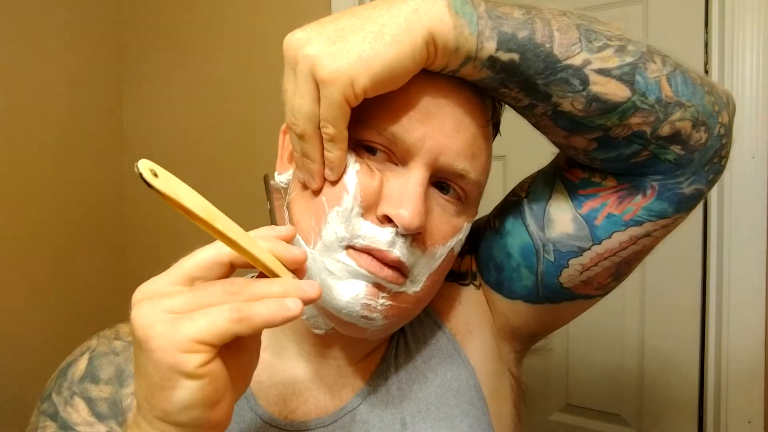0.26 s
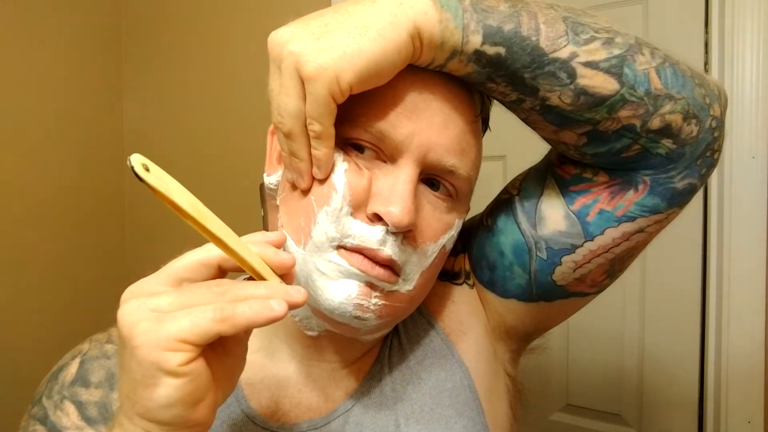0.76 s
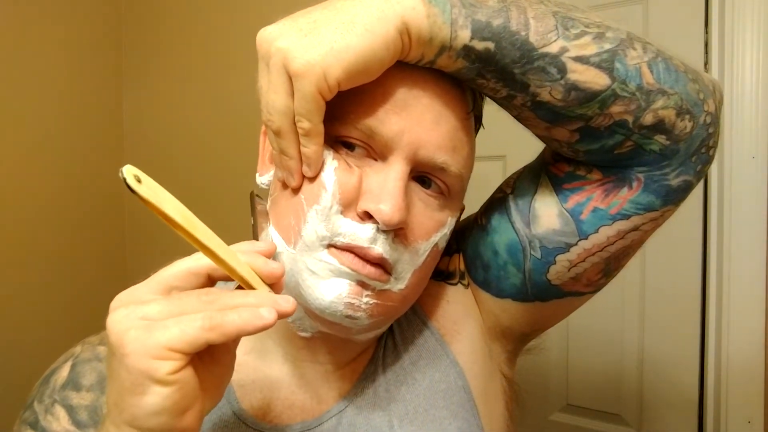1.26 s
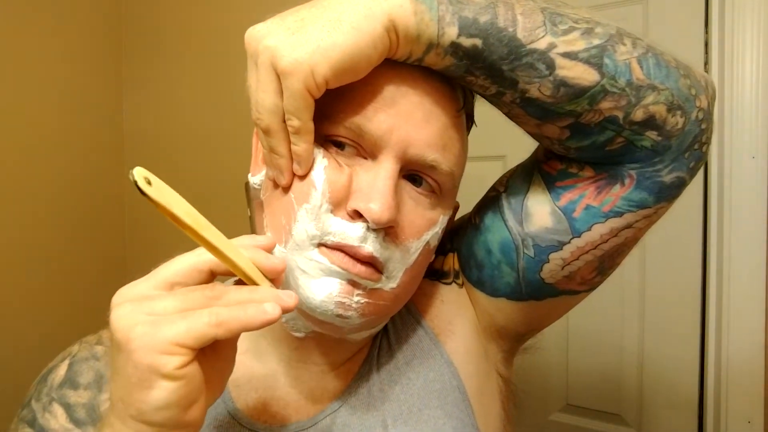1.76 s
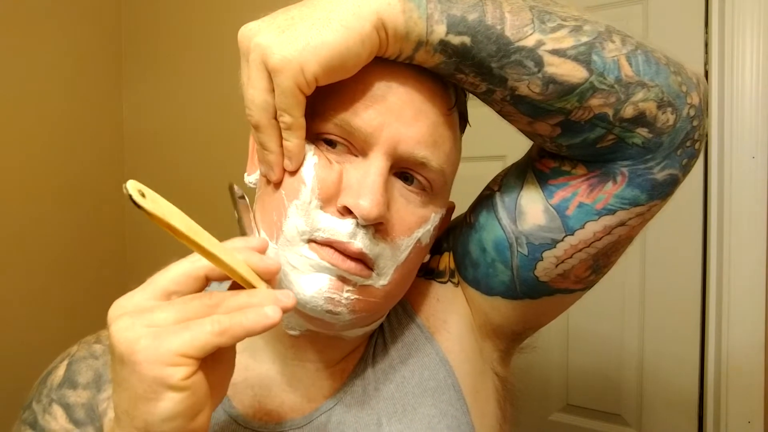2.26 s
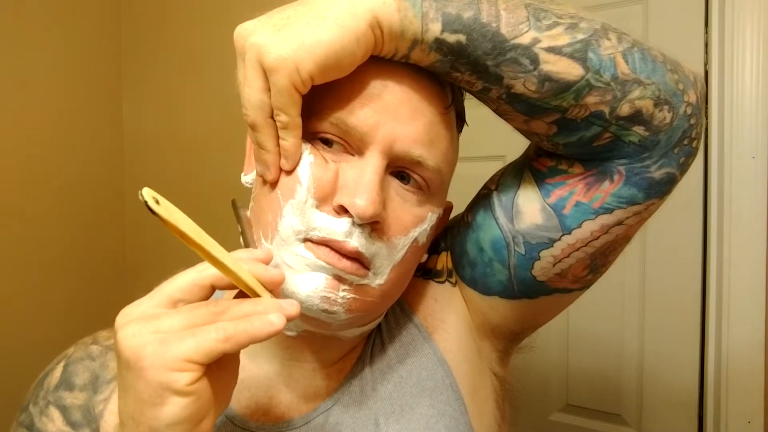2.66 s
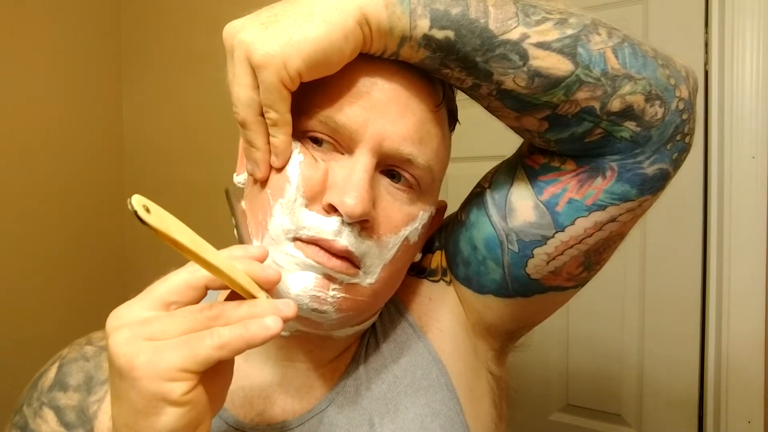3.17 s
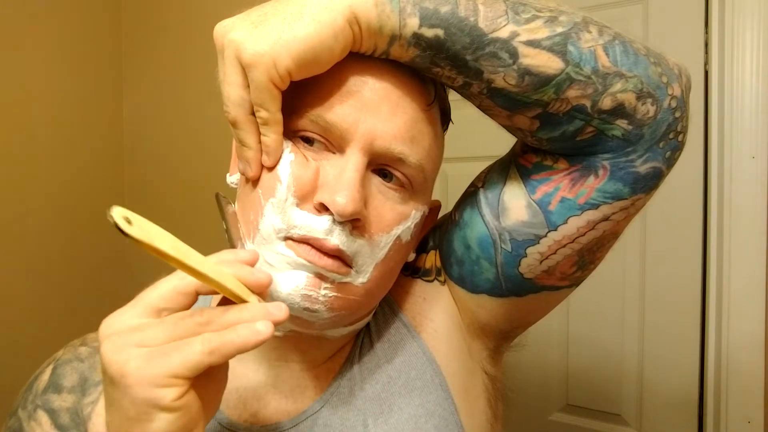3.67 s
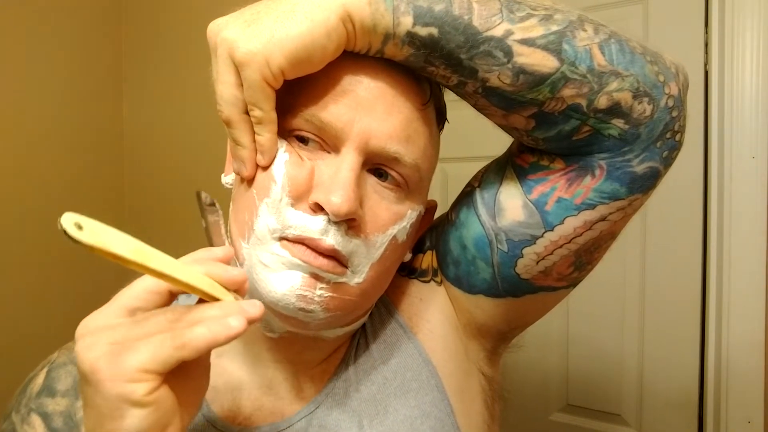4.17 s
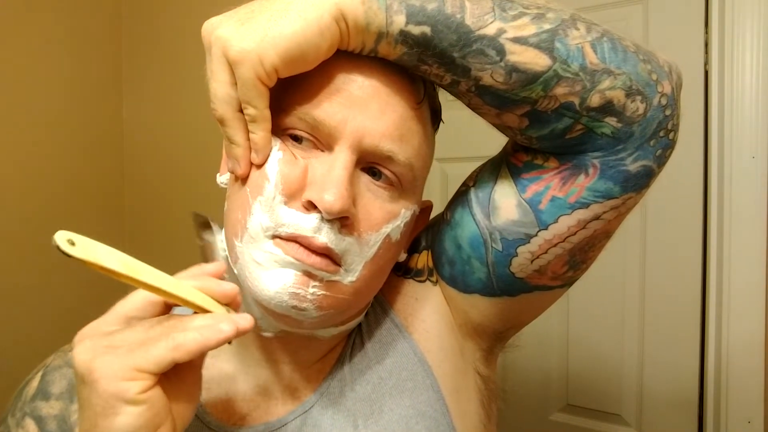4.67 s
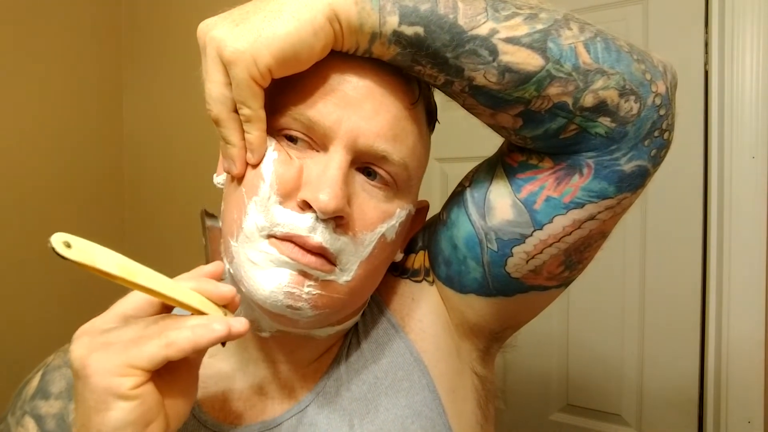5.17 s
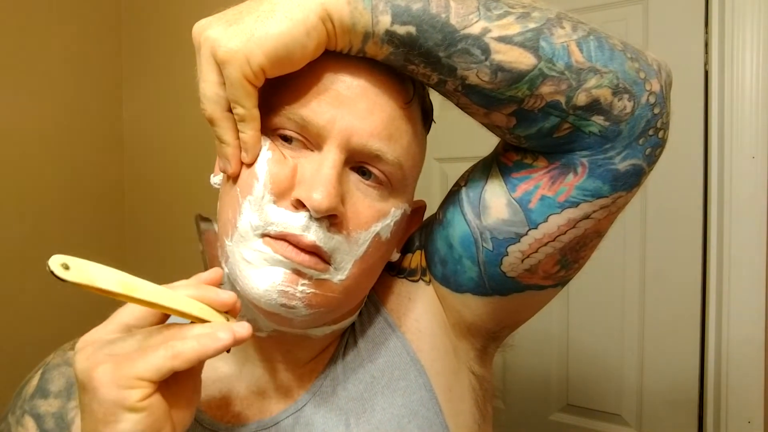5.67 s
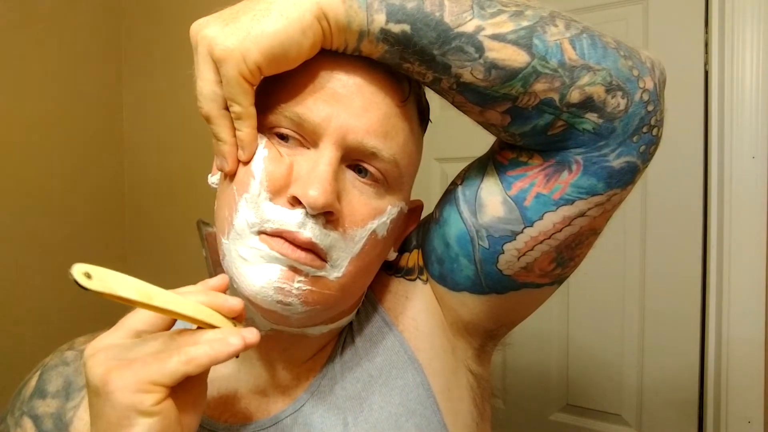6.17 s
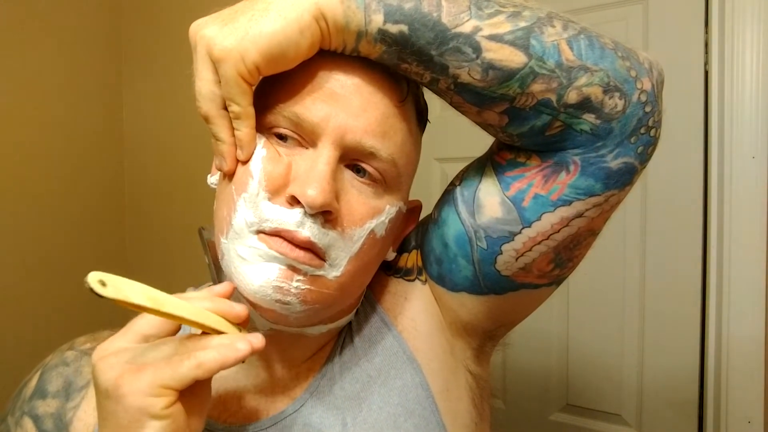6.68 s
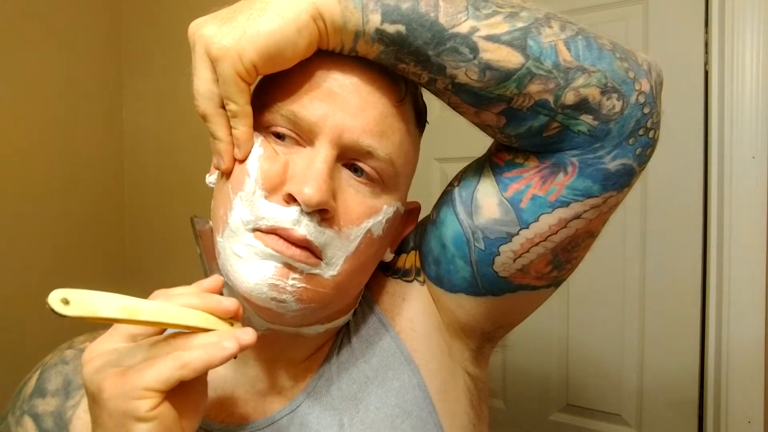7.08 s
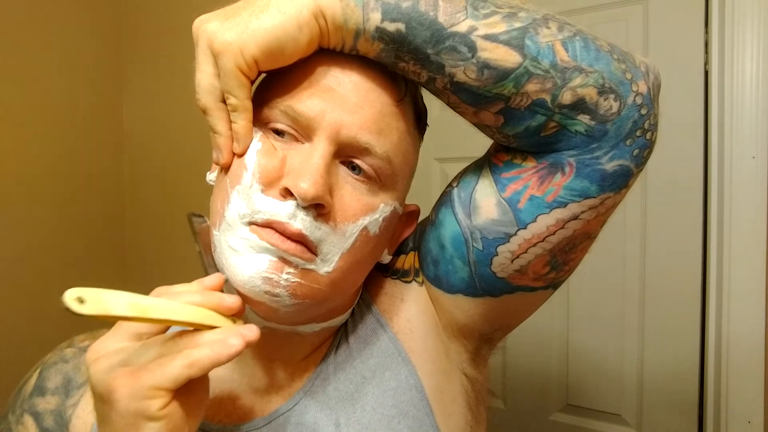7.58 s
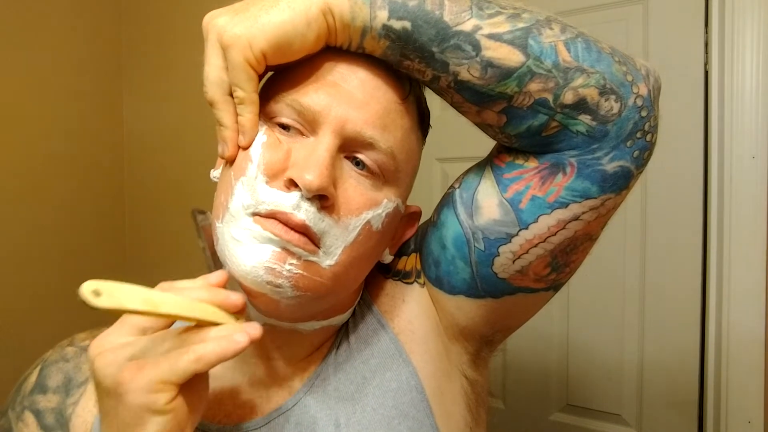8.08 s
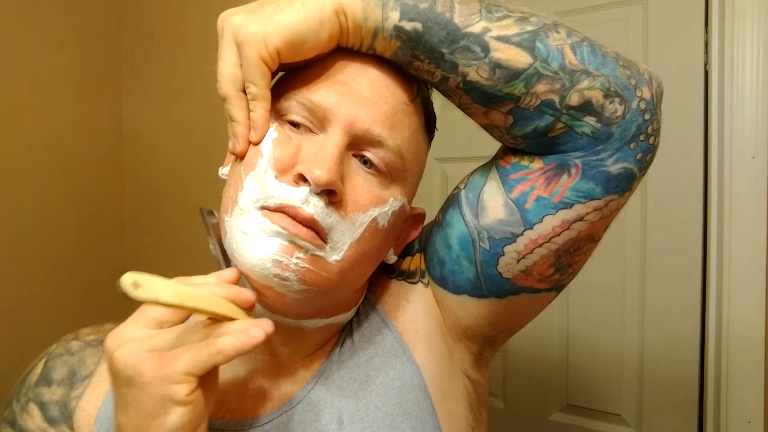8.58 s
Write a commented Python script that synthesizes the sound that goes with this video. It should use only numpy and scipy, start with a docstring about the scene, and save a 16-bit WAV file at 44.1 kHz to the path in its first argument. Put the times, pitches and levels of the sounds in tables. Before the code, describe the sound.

Short dry scrapes and tiny crackling ticks of a blade cutting stubble, with a brief wet squeak near the end, above humming ventilation.

```python
"""A straight razor scrapes lathered stubble off a cheek in short strokes; a fan and motors hum in a small bathroom.
Each cut hair is a random click, coloured by the face, that also plucks resonances of the thin blade.
Stiff hairs tear in noise bursts; late on come a hollow tone of narrow noise and a wet squeak of gliding partials.
The fan is coloured noise, the motors steady sines; skin, hand and walls echo the razor.
A phone hears it through two ports and spreads them wide, the right side dull and in opposite polarity."""
import sys
import numpy as np
from scipy import signal
from scipy.fft import rfft, irfft
from scipy.io import wavfile
from scipy.ndimage import map_coordinates

SR = 44100
rng = np.random.default_rng(int(sys.argv[2]) if len(sys.argv) > 2 else 0)


def bounce(signal):
    """Save signal as a 16-bit WAV file at the path given by the first command-line argument."""
    frames = np.transpose(np.atleast_2d(signal))
    limited = np.clip(frames, -1, 1)
    pcm = np.round(limited * 32767).astype(np.int16)
    wavfile.write(sys.argv[1], SR, pcm)


N = 389168
TIME_S = np.arange(N) / SR
FREQ_HZ = np.fft.rfftfreq(N, 1 / SR)


def undb(db):
    """Decibels to gain."""
    return 10 ** (np.asarray(db) / 20)


def unit(x):
    """Scale to rms 1."""
    return x / np.sqrt(np.mean(x ** 2))


def curves(table):
    """Columns of a timed table, interpolated to every sample."""
    time_s, *columns = np.transpose(table)
    return [np.interp(TIME_S, time_s, column) for column in columns]


def colour(points):
    """Gain at every frequency from (freq_hz, level_db) points."""
    hz, db = np.transpose(points)
    return undb(np.interp(np.log(FREQ_HZ + 1), np.log(hz), db))


def causal(gain):
    """Minimum-phase response with this gain: it rings only after a blow."""
    cepstrum = irfft(np.log(gain), N)
    cepstrum[1:N // 2] *= 2
    cepstrum[N // 2 + 1:] = 0
    return np.exp(rfft(cepstrum))


def through(x, response):
    """Filter by a frequency response."""
    return irfft(rfft(x) * response, N)


def delay(lag_ms):
    """Response of a pure delay."""
    return np.exp(-2j * np.pi * FREQ_HZ * lag_ms / 1000)


def noise():
    """White noise of 0 dB per Hz."""
    return rng.standard_normal(N) * np.sqrt(SR / 2)


def walk(knots_per_s):
    """Smooth random drift with a spread near 1."""
    knots = rng.standard_normal(N // 20)
    return 1.2 * np.interp(TIME_S * knots_per_s, np.arange(len(knots)), knots)


# port difference relative to port sum, for sound from all sides: freq_hz [Hz], level_db [dB]
PORT_SPREAD = [(60, -20), (250, -13), (550, -9), (1600, -4), (2800, -2.5), (4000, -6), (8000, -6)]


def two_ports(common, apart):
    """What each port hears: a shared part, plus a part of opposite sign at the two ports."""
    spread = colour(PORT_SPREAD)
    share = 1 / np.sqrt(1 + spread ** 2)
    shared = through(common, share)
    difference = through(apart, share * spread)
    return shared + np.array([[1], [-1]]) * difference


# fan rush before the room lifts it: freq_hz [Hz], density_db [dB per Hz]
FAN_AIR = [(25, -70.5), (36, -86), (52, -72), (100, -74.5), (330, -80), (600, -81.5), (850, -87.5),
           (1400, -92), (2100, -96), (2900, -100), (4500, -100), (8000, -99), (12000, -107), (15500, -110)]
# room resonances: freq_hz [Hz], width_hz [Hz], lift_db [dB]
ROOM_MODES = [(142, 35.4, 13.5), (190, 23, 7.5), (247.7, 13, 7), (289.8, 40, 11.5), (352.3, 3.8, 10.5),
              (400, 46, 8), (448, 17.5, 7.5), (486.4, 35, 5.5), (537.5, 21, 7.5), (639, 13, 6),
              (684, 12.5, 5), (910, 30, 2), (1070, 39, 4), (1180, 24, 3.5)]
# slow swell of the rush: time_s [s], level_db [dB]
FAN_FLOW = [(0, 0), (.7, -0.4), (1.55, 0), (2.0, 1), (2.33, -0.2), (2.7, 1), (2.98, -.5), (3.25, 1),
            (3.45, -1.5), (3.7, -0.2), (4.42, -0.1), (4.7, 2), (5.0, -0.5), (5.3, 2), (5.75, 2), (5.98, -1),
            (6.27, 2), (6.48, -0.8), (6.8, 2.5), (7.1, -0.5), (7.38, 2.5), (7.62, -0.1), (7.88, 0.7),
            (8.1, -1), (8.42, 2.2), (8.8, -0.1)]


def fan(flutter_db=0.75):
    """Moving air: coloured noise lifted by the room resonances, swelling and fluttering."""
    lift_db = sum(db / (1 + (2 * (FREQ_HZ - hz) / width_hz) ** 2) for hz, width_hz, db in ROOM_MODES)
    rush = through(np.array([noise(), noise()]), colour(FAN_AIR) * undb(lift_db))
    return two_ports(*rush) * undb(curves(FAN_FLOW)[0] + flutter_db * walk(7))


# fan and motor tones, before drift: freq_hz [Hz], rms_db [dB]
HUM_TONES = [(58.2, -46), (116.2, -53), (178.3, -54.5), (252.7, -67), (291.0, -72.5), (349.2, -59.5),
             (360.0, -62.5), (469.4, -53), (764.0, -71), (814.6, -69.5), (934.0, -73.5), (1047.4, -73.5),
             (1064.5, -75.5), (1513.0, -77)]
# close motor tones that beat, before drift: freq_hz [Hz], rms_db [dB]
BEATING_MOTORS = [(120.0, -52.5), (122.43, -47.7), (126.32, -54.3)]
IN_STEP_S = 1.45  # the beating tones nearly align here [s]


def hum():
    """Mains and motor sines, drifting slightly in pitch; the close ones beat into a slow throb."""
    drifted_s = np.cumsum(1 + .0006 * walk(3)) / SR
    tones = np.zeros(N)
    for hz, db in HUM_TONES:
        level = undb(db + .4 * walk(4))
        tones += level * np.sin(2 * np.pi * (hz * drifted_s + rng.random()))
    start_cycles = rng.random()
    throb = np.zeros(N)
    for hz, db in BEATING_MOTORS:
        throb += undb(db) * np.sin(2 * np.pi * (hz * (drifted_s - IN_STEP_S) + start_cycles))
    return np.sqrt(2) * (tones + throb)  # rms to peak


# edge lands or snags a stiff hair: start_s [s], level_db [dB, burst energy before snag_db]
SNAGS = [(0.8247, -33), (0.832, -34), (0.94, -36), (0.9594, -41.5), (0.999, -37), (1.079, -46),
         (1.1124, -44), (1.181, -40), (1.1874, -40), (1.2605, -36), (1.685, -43), (1.747, -38), (1.78, -38),
         (1.931, -38), (1.962, -37), (1.977, -41), (1.998, -37), (2.058, -34), (2.067, -30), (2.145, -41),
         (2.449, -38), (2.582, -33), (2.645, -36), (2.72, -39), (2.7472, -41), (3.097, -37), (3.132, -41),
         (3.232, -40), (3.31, -36), (3.412, -28), (3.4851, -35), (3.662, -37), (3.86, -47), (4.002, -35),
         (4.456, -46), (4.574, -38), (4.5775, -38), (4.6003, -39), (4.62, -40), (5.56, -38), (5.609, -36),
         (6.156, -35), (6.2246, -26), (6.228, -27), (6.426, -39), (6.521, -31), (6.557, -29), (6.5847, -37),
         (6.6205, -36), (6.6352, -27), (6.729, -43), (6.986, -31), (6.997, -39), (7.0229, -31),
         (7.136, -36), (7.2012, -33), (7.216, -36), (7.229, -27), (7.359, -46), (7.668, -32), (7.7905, -37),
         (8.181, -45), (8.206, -46), (8.261, -44), (8.3362, -31), (8.3642, -30), (8.421, -45),
         (8.4504, -41), (8.624, -48), (8.662, -53), (8.703, -45)]


def snagging(tear_s=0.00025):
    """A stiff hair tears in a tiny burst of cracks: decaying noise, about a millisecond long."""
    out = np.zeros(N)
    fade = np.exp(-TIME_S[TIME_S < .005] / tear_s)
    for start_s, level_db in SNAGS:
        burst = rng.standard_normal(len(fade)) * fade
        first = int(start_s * SR)
        out[first:first + len(fade)] += undb(level_db) * burst / np.sqrt(np.sum(burst ** 2))
    return out


# pulls of the razor: start_s [s], press_s [s], draw_s [s], level_db [dB before scrape_db],
# ring_db [dB relative to the scrape, before ring_gain_db; how freely the blade sounds at that angle]
STROKES = [(0.937, 0.007, 0.018, -55, -20), (1.04, 0.02, 0.036, -53.5, -16),
           (1.152, 0.014, 0.013, -48.5, -16), (1.268, 0.018, 0.087, -44.5, -13),
           (1.68, 0.0042, 0.013, -53, -2), (1.762, 0.034, 0.028, -43.5, -0.5),
           (1.922, 0.02, 0.064, -51, -2), (2.019, 0.026, 0.11, -46, -9), (2.413, 0.034, 0.025, -47.5, 0),
           (2.515, 0.028, 0.027, -46, -1), (2.63, 0.068, 0.045, -47.5, 0.5), (3.095, .01, 0.055, -63, 1),
           (3.158, 0.031, 0.04, -47.5, 2), (3.24, 0.042, 0.034, -49, 4), (3.335, 0.022, .05, -49.5, 1),
           (3.465, 0.011, 0.0083, -55, -16), (3.56, 0.033, .04, -62.5, -20), (3.648, 0.0097, 0.044, -59, 3),
           (3.733, 0.024, 0.027, -48, 1.5), (3.81, 0.055, 0.068, -51, 0), (3.96, 0.042, 0.027, -53, -7),
           (4.355, 0.037, 0.037, -53, -1), (4.512, 0.049, 0.069, -45.5, -4), (4.92, 0.1, 0.072, -54.5, 0),
           (5.07, 0.054, 0.021, -45, 1), (5.2, 0.011, .01, -55.5, -12), (5.513, 0.028, 0.016, -52, -3),
           (5.585, 0.051, 0.033, -45, -1), (5.962, 0.033, 0.017, -48, -5), (6.074, 0.04, 0.036, -43.5, -2),
           (6.22, 0.0064, 0.014, -49.5, -20), (6.506, 0.043, 0.14, -45, -1.5),
           (6.979, 0.011, 0.047, -53, -14), (7.068, 0.011, 0.088, -48, -4), (7.18, 0.053, 0.016, -44, 1),
           (7.634, 0.088, 0.105, -46, -6), (8.171, 0.0057, 0.04, -52.5, 0), (8.225, 0.079, 0.052, -47, 0),
           (8.405, 0.018, 0.03, -56.5, 1), (8.52, 0.12, .1, -61, -6), (8.69, 0.066, 0.059, -49, -1)]
TOUCH_DB, GRIP_S = -11, 0.0021  # landing level under full pressure, time to grip
SAG_DB_PER_S, LIFT_DB_PER_S = 17, 176  # fall while drawn, fall while lifting
FIZZLE_DB, FIZZLE_DB_PER_S = -27.5, 35  # disturbed lather: level relative to the stroke, its fade


def strokes():
    """Each pull lands, presses in, is drawn and lifts off; returns scrape and blade-ring levels in dB."""
    scrape_power, ring_power = np.full(N, 1e-9), np.full(N, 1e-10)
    for start_s, press_s, draw_s, level_db, ring_db in STROKES:
        first = int(start_s * SR)
        age_s = TIME_S[:N - first]
        lifted_s = np.maximum(age_s - press_s - draw_s, 0)
        pressing_db = TOUCH_DB * np.maximum(1 - age_s / press_s, 0)
        sag_db = SAG_DB_PER_S * np.clip(age_s - press_s, 0, draw_s)
        grip = np.minimum(age_s / GRIP_S, 1)
        edge = grip * undb(level_db + pressing_db - sag_db - LIFT_DB_PER_S * lifted_s)
        fizzle = (lifted_s > 0) * undb(level_db + FIZZLE_DB - FIZZLE_DB_PER_S * lifted_s)
        scrape_power[first:] += edge ** 2 + fizzle ** 2
        ring_power[first:] += (edge * undb(ring_db)) ** 2
    return 10 * np.log10(scrape_power), 10 * np.log10(ring_power)


def catches(per_second, release_s):
    """The edge catches on stubble and lets go: loosely spaced jolts that die away, rms 1."""
    gaps_s = rng.gamma(3, 1 / (3 * per_second), N // 50)
    at = (np.cumsum(gaps_s) * SR).astype(int)
    sizes = rng.uniform(.35, 1, len(at))
    jolts = np.zeros(N)
    jolts[at[at < N]] = sizes[at < N]
    return unit(signal.lfilter([1], [1, -np.exp(-1 / (release_s * SR))], jolts))


def hair_snaps(per_second, scatter_db):
    """Random snaps of uneven size, at constant mean power whatever their rate."""
    chance = np.clip(per_second / SR, 1e-4, 1)
    size = unit(undb(scatter_db * np.clip(rng.standard_normal(N), -2, 2)))
    sign = rng.choice([-1, 1], N)
    return (rng.random(N) < chance) * sign * size / np.sqrt(chance)


# blade modes, damped by the grip differently in each place:
# freq_hz [Hz before grip drift], pole_width_hz [Hz], cheek_db [dB], jaw_db [dB]
BLADE_MODES = [(8070, 310, 2, -16), (10680, 600, -17, -2.5), (12000, 420, 3.5, -1.5)]


def blade(plucks, jaw, grip_drift=.003, grip_db=.9):
    """Ringing steel: steep-sided resonances whose pitch and strength shift with the grip."""
    out, bend = np.zeros(N), 1 + grip_drift * walk(13)
    for hz, width_hz, cheek_db, jaw_db in BLADE_MODES:
        turn = np.exp(2j * np.pi * np.cumsum(hz * bend) / SR)
        pole = np.exp(-np.pi * width_hz / SR)
        # shift the mode to 0 Hz, smooth with a double pole, shift back
        smoothed = signal.lfilter([(1 - pole) ** 2], [1, -2 * pole, pole ** 2], plucks / turn)
        ring = 2 * np.real(turn * smoothed)
        strength = np.sqrt((1 - jaw) * undb(cheek_db) ** 2 + jaw * undb(jaw_db) ** 2)
        out += ring * strength * undb(grip_db * walk(9))
    return out


SKIN_ECHO_MS, SKIN_ECHO_SHARE = (0.584, 0.567), 0.16  # mean lag (cheek, jaw), echo gain


def skin_echo(x, jaw, sway_ms=0.012):
    """The face mirrors the sound; the lag sways as the razor travels, so the spectral ripple moves."""
    lag_ms = np.interp(jaw, [0, 1], SKIN_ECHO_MS) + sway_ms * walk(12)
    echo = map_coordinates(x, [(TIME_S - lag_ms / 1000) * SR], mode="nearest")
    return x + SKIN_ECHO_SHARE * echo


# colour of one cut hair high on the cheek, scaled to unit gain: freq_hz [Hz], level_db [dB, relative]
SNAP_CHEEK = [(900, -14), (2000, -6), (3000, -8.5), (3700, -5.5), (4400, -9), (5700, -3.5), (6250, -3),
              (6600, 4.5), (7400, -3), (8600, 1.5), (9600, -5), (11000, -4.5), (12800, -10), (14500, -17),
              (15700, -3)]
# same by the jaw: freq_hz [Hz], level_db [dB, relative]
SNAP_JAW = [(900, -19), (2000, -16), (3500, -11.5), (4500, -7), (5300, -4), (6200, -1.5), (7200, 4.5),
            (8000, -2.5), (9100, 3.5), (10700, -2.5), (11500, -2), (13000, -5), (14300, -1.5), (15000, -5),
            (15700, -3)]
# how far down the face the razor works: time_s [s], jaw [0 cheek - 1 jaw]
FACE_PLACE = [(1.3, 0.032), (3.9, 0.43), (4.6, 0.77), (6, 0.88)]


def scrape(hairs_per_s=5200, full_db=-47, scrape_db=-2.0, ring_gain_db=8.0,
           lather_db=-10, snag_db=4.5, snag_ring_db=-1):
    """Harder strokes snap more hairs (hairs_per_s at full_db); the edge judders and the lather hisses."""
    level_db, ring_db = strokes()
    rate = hairs_per_s * undb(level_db - full_db)
    judder = unit(1 + .6 * catches(per_second=260, release_s=.001))
    snags = undb(snag_db) * snagging()
    lather = undb(lather_db) * rng.standard_normal(N)
    cutting = hair_snaps(rate, scatter_db=2.5) + lather
    cut = cutting * judder * undb(level_db + scrape_db) + snags
    # hairs that flick past the edge pluck the steel
    flicks = hair_snaps(rate, scatter_db=2.5) * judder
    plucks = flicks * undb(ring_db + ring_gain_db) + undb(snag_ring_db) * snags
    jaw = np.clip(curves(FACE_PLACE)[0], 0, 1)
    snaps = np.zeros(N)
    for share, snap in [(1 - jaw, SNAP_CHEEK), (jaw, SNAP_JAW)]:
        snaps += through(np.sqrt(share) * cut, causal(unit(colour(snap))))
    return skin_echo(snaps + blade(plucks, jaw), jaw)


# faint hollow tone: time_s [s], level_db [dB before hoot_db]
HOOT_LEVEL = [(8.41, -70), (8.44, -55), (8.465, -66), (8.505, -58), (8.575, -61), (8.6, -72)]


def hoot(centre_hz=1075, width_hz=100, hoot_db=-4):
    """A faint, hollow, unsteady tone near the last strokes: a narrow band of noise."""
    edges_hz = [centre_hz - width_hz / 2, centre_hz + width_hz / 2]
    band = signal.sosfilt(signal.butter(2, edges_hz, "band", fs=SR, output="sos"), noise())
    sounding = (TIME_S > HOOT_LEVEL[0][0]) & (TIME_S < HOOT_LEVEL[-1][0])
    return sounding * unit(band) * undb(curves(HOOT_LEVEL)[0] + hoot_db)


# one list per whistle: time_s [s], pitch_hz [Hz before waver], level_db [dB before squeak_db and waver]
SQUEAK_GLIDES = [
    [(8.482, 4030, -72), (8.498, 4260, -63), (8.515, 4330, -68), (8.53, 4310, -63), (8.548, 4120, -66),
     (8.557, 4230, -65), (8.575, 4060, -73)],
    [(8.498, 3990, -72), (8.51, 4000, -65), (8.52, 4060, -72), (8.528, 4040, -63), (8.552, 3830, -64),
     (8.563, 3640, -62), (8.58, 3495, -63), (8.605, 3550, -56.5), (8.628, 3600, -61), (8.642, 3550, -61),
     (8.658, 3500, -69)],
    [(8.5, 2530, -67), (8.513, 2520, -55), (8.526, 2515, -55.5), (8.535, 2510, -68)],
]


def squeak(waver=0.0043, squeak_db=-3.0):
    """Fast stick and slip of wet steel: thin, unsteady whistles, the third partial strongest."""
    out = np.zeros(N)
    for glide in SQUEAK_GLIDES:
        pitch_hz, level_db = curves(glide)
        on = (TIME_S > glide[0][0]) & (TIME_S < glide[-1][0])
        wavering_hz = pitch_hz * (1 + waver * walk(400))
        phase = 2 * np.pi * np.cumsum(wavering_hz[on]) / SR
        partials = .4 * np.sin(phase) + .35 * np.sin(2 * phase) + np.sin(3 * phase)
        out[on] += undb((level_db + squeak_db + 2.5 * walk(120))[on]) * partials
    return out


def echoes(x, t60_s, hold_s):
    """Dense decaying reflections with a power gain of 1; their pattern changes every hold_s."""
    hop = int(hold_s * SR)
    age_s = TIME_S[TIME_S < t60_s]
    fade = undb(-60 * age_s / t60_s) * (age_s > .001)
    blend = np.sin(np.pi * np.arange(2 * hop) / (2 * hop))
    out = np.zeros(N + 2 * hop + len(age_s))
    for first in range(0, N, hop):
        piece = x[first:first + 2 * hop]
        pattern = rng.standard_normal(len(fade))
        heard = signal.fftconvolve(piece * blend[:len(piece)], pattern * fade)
        out[first:first + len(heard)] += heard
    return out[:N] / np.sqrt(np.sum(fade ** 2))


HAND_T60_S, HAND_HOLD_S = .032, .025  # decay and pattern life of the hand scatter
WALL_T60_S, WALL_HOLD_S = .27, .05  # same for the walls


def bathroom(x, wet_db=-8, dull_hz=8500):
    """The moving hand scatters sound unevenly to the ports; hard walls add a duller tail."""
    dulling = signal.butter(3, dull_hz, fs=SR, output="sos")
    walls = undb(wet_db) * signal.sosfilt(dulling, x)
    common = x + echoes(walls, WALL_T60_S, WALL_HOLD_S)
    apart = echoes(x, HAND_T60_S, HAND_HOLD_S) + echoes(walls, WALL_T60_S, WALL_HOLD_S)
    return two_ports(common, apart)


def scene():
    """Razor and room at the two ports."""
    return bathroom(scrape() + squeak() + hoot()) + fan() + hum()


# response of the right side: freq_hz [Hz], level_db [dB]
RIGHT_SIDE = [(300, -1.4), (1000, -.8), (2050, 0), (2400, 0), (3000, -1), (4250, -.3), (4550, -.4),
              (5400, -2.8), (6800, -6.8), (8000, -13), (9500, -21), (12000, -28)]
# electronic hiss: freq_hz [Hz], density_db [dB per Hz]
HISS = [(4000, -124), (9000, -112), (15500, -118)]
TOP_HZ = 15650  # upper band limit [Hz]


def record(dry):
    """The phone widens the pair with a short cross delay, adds its own hiss and cuts the top."""
    common, apart = (dry[0] + dry[1]) / 2, (dry[0] - dry[1]) / 2
    lag = delay(lag_ms=.4535)
    left = common + through(apart, lag)
    right = -through(through(common, lag) + apart, colour(RIGHT_SIDE))
    hiss = through(np.array([noise(), noise()]), colour(HISS))
    top_cut = signal.ellip(12, .1, 80, TOP_HZ, fs=SR, output="sos")
    return signal.sosfilt(top_cut, np.array([left, right]) + hiss)


dry = scene()
out = record(dry)
bounce(out)
```